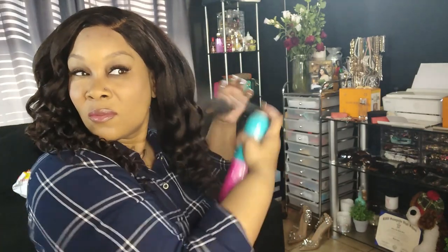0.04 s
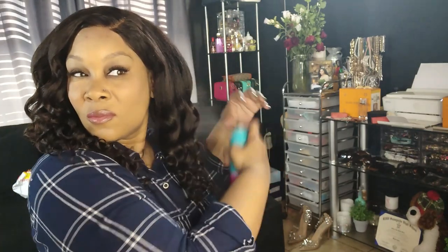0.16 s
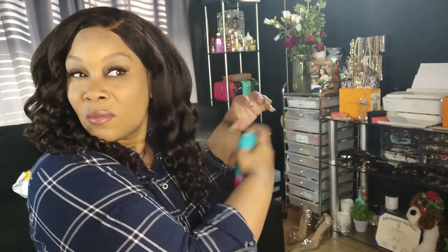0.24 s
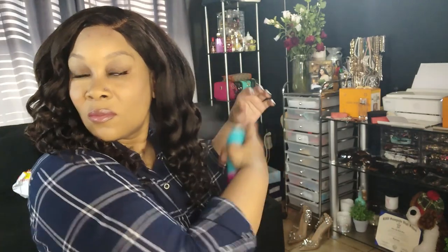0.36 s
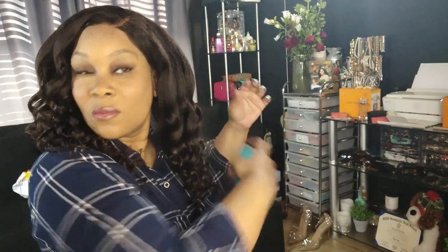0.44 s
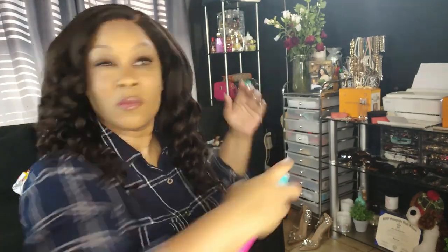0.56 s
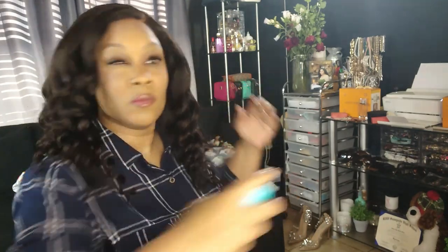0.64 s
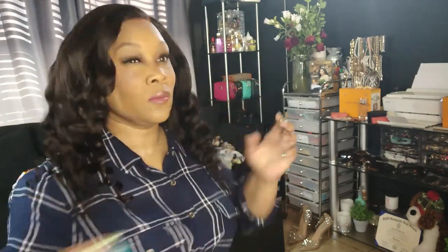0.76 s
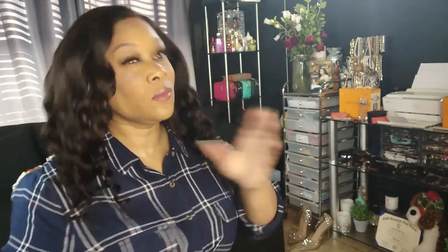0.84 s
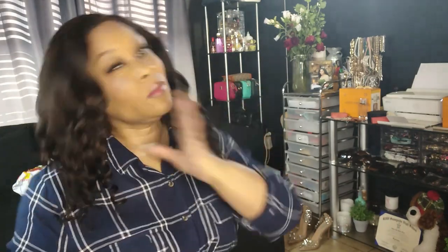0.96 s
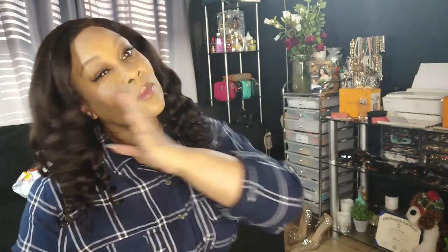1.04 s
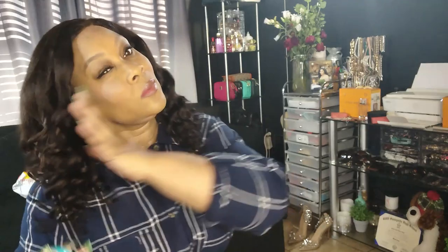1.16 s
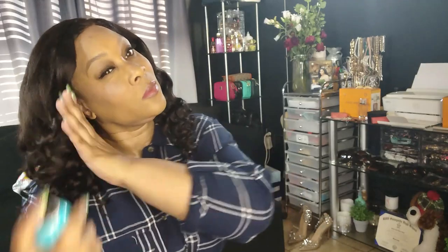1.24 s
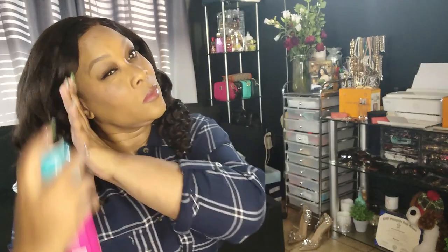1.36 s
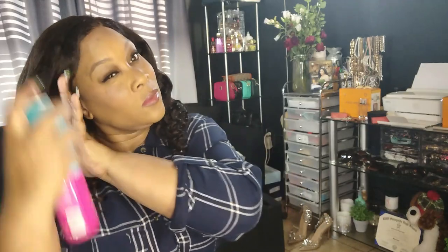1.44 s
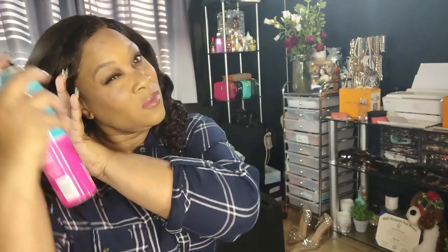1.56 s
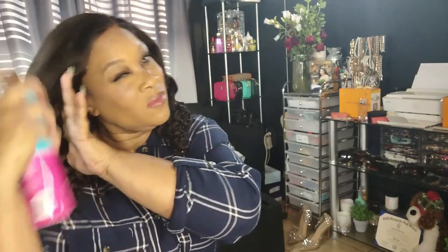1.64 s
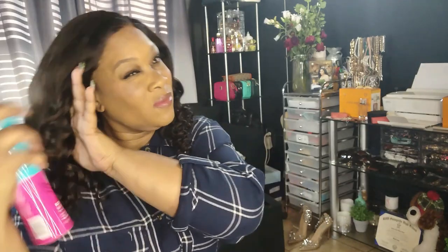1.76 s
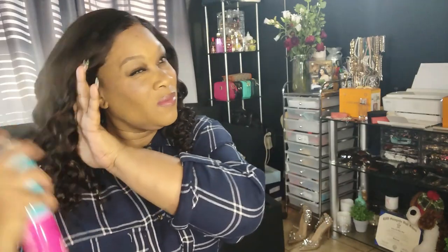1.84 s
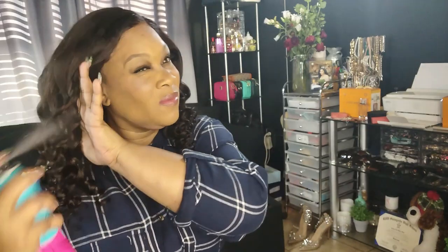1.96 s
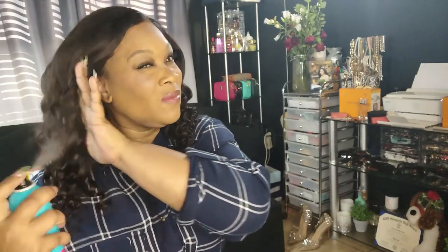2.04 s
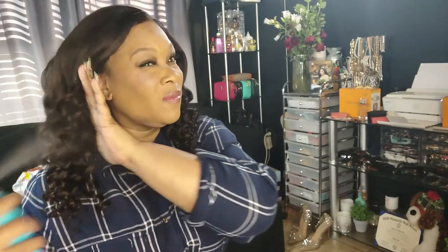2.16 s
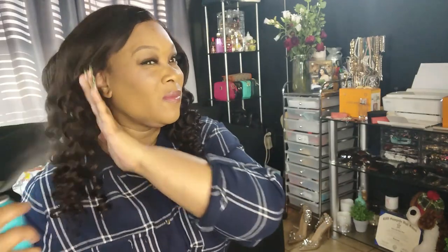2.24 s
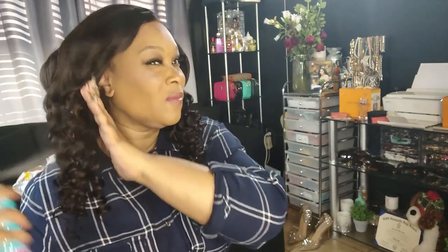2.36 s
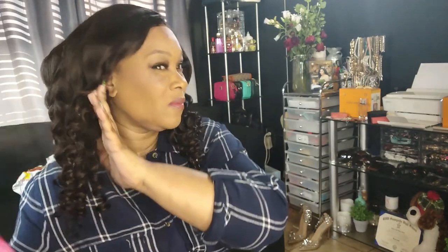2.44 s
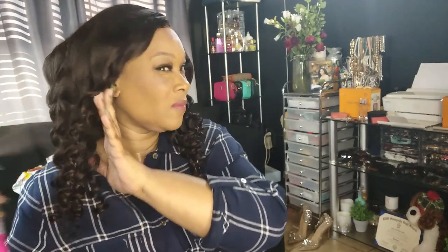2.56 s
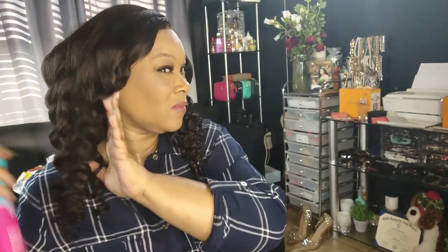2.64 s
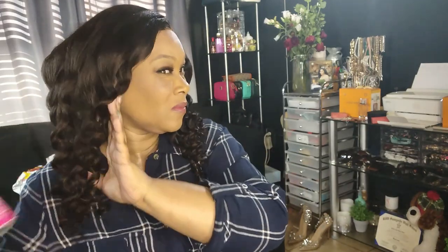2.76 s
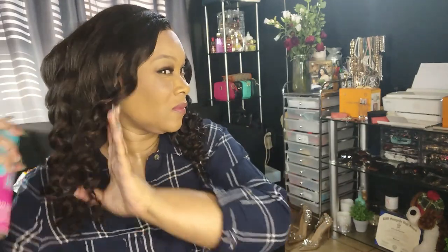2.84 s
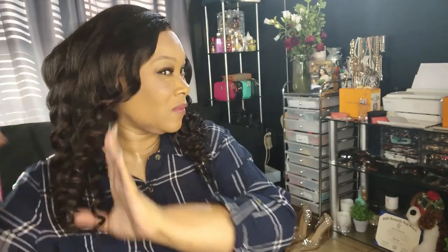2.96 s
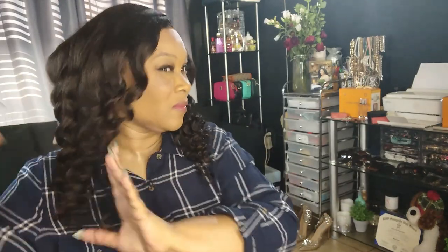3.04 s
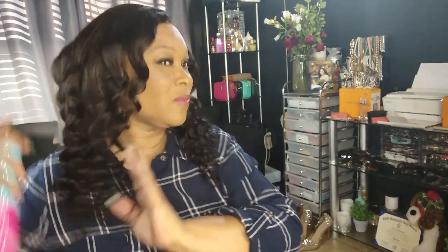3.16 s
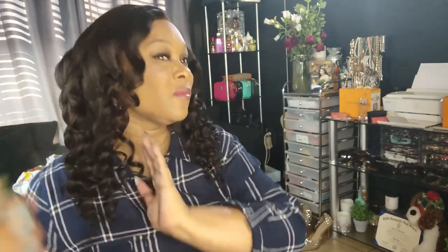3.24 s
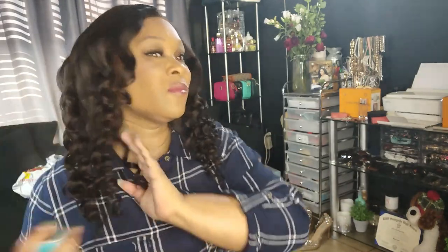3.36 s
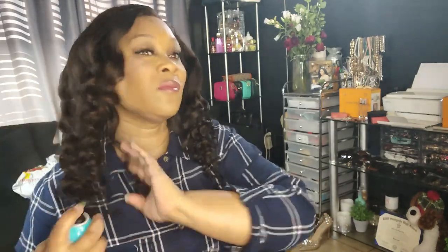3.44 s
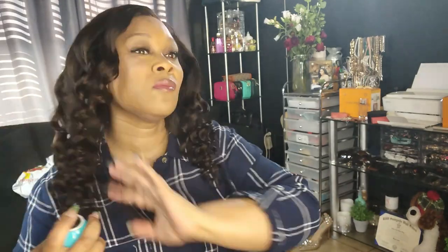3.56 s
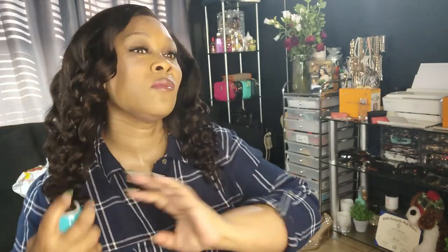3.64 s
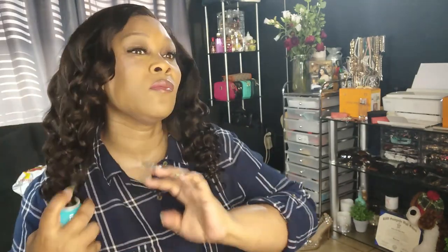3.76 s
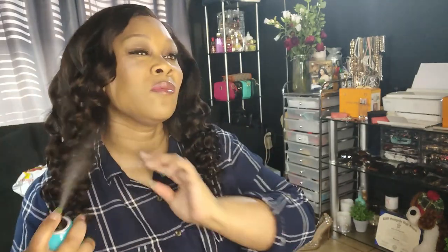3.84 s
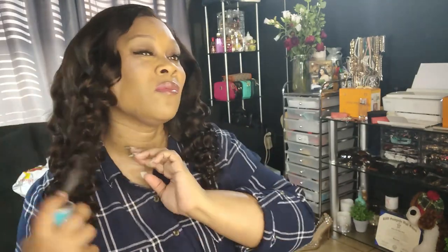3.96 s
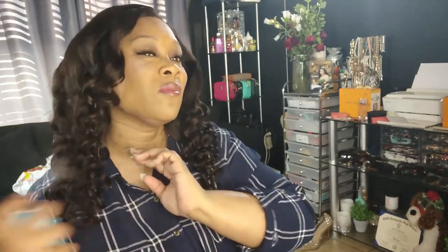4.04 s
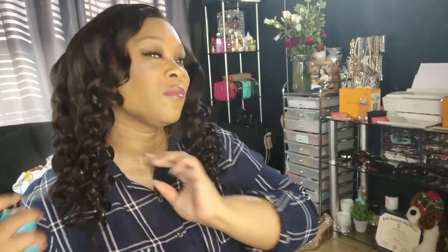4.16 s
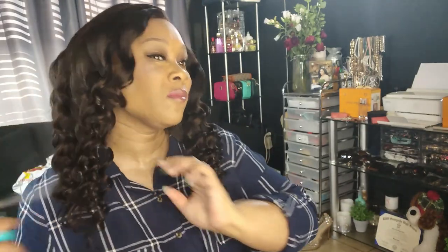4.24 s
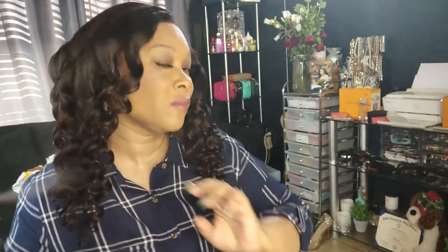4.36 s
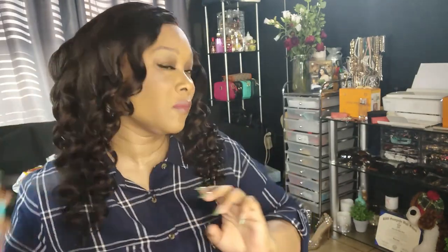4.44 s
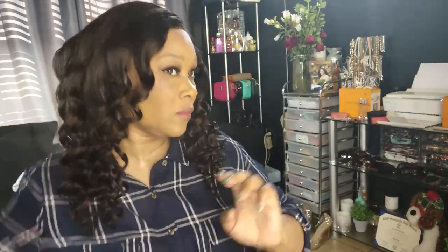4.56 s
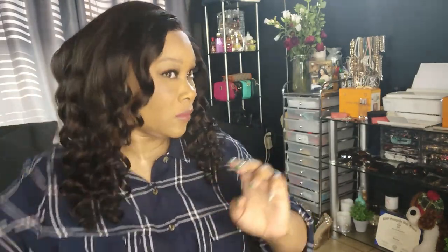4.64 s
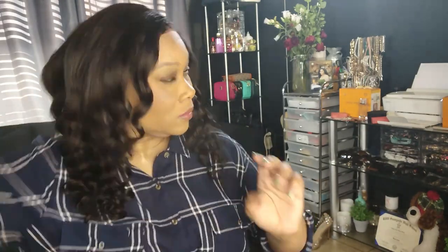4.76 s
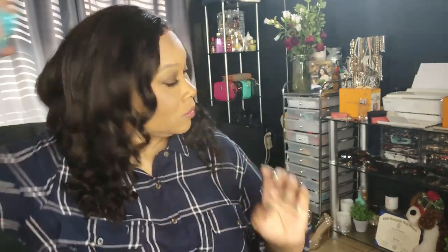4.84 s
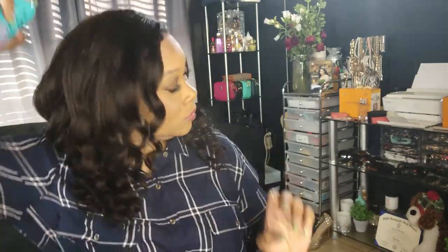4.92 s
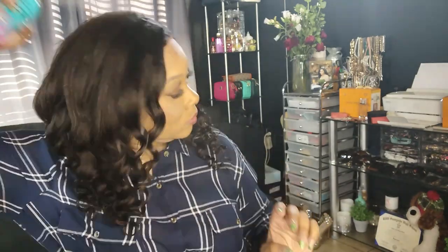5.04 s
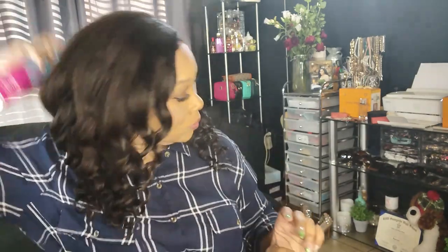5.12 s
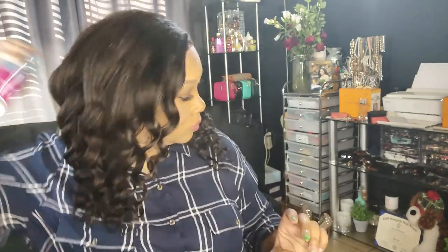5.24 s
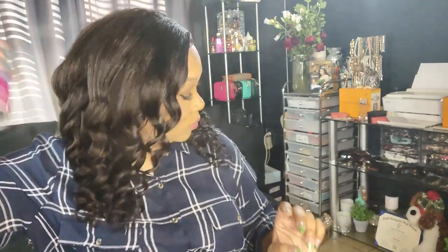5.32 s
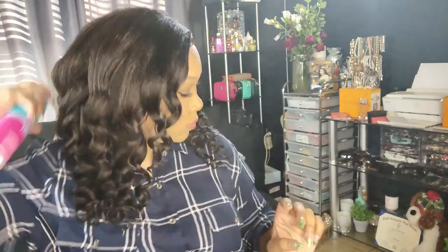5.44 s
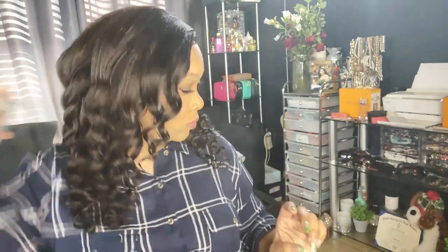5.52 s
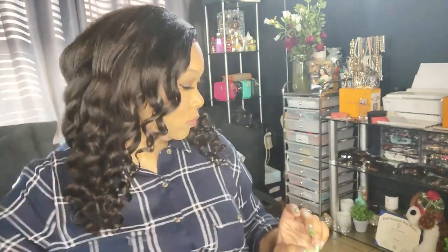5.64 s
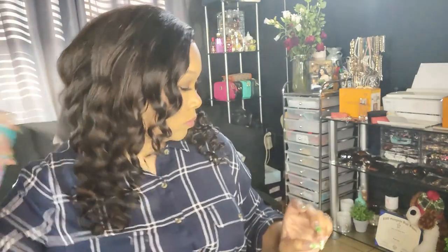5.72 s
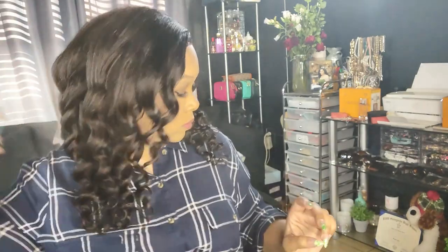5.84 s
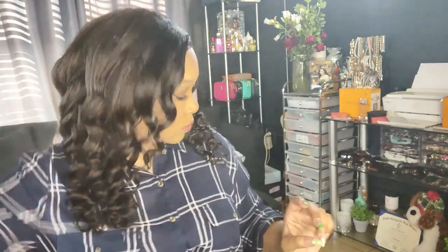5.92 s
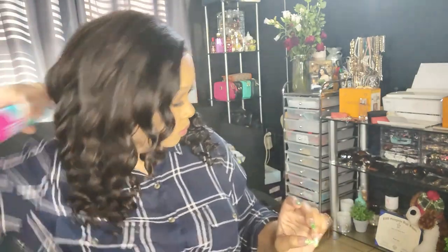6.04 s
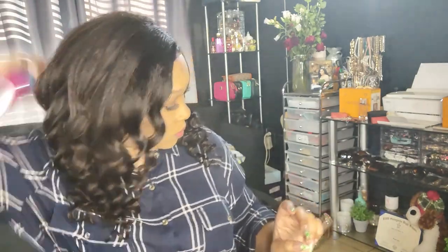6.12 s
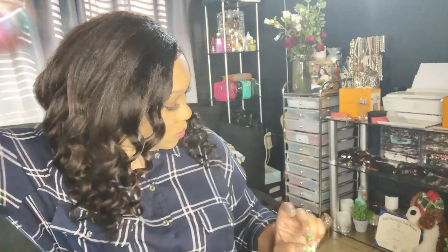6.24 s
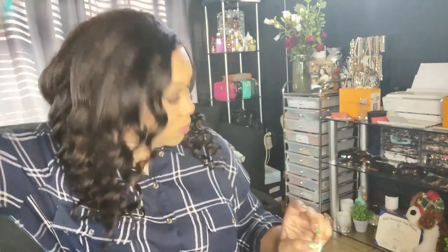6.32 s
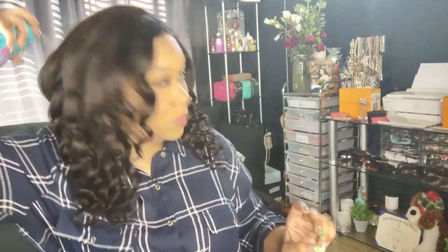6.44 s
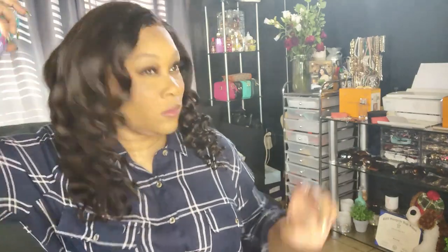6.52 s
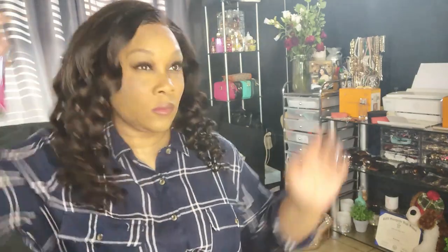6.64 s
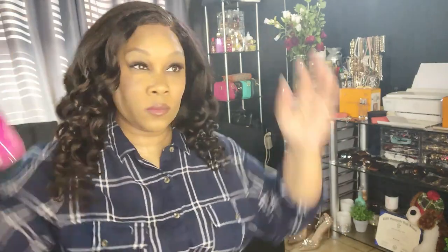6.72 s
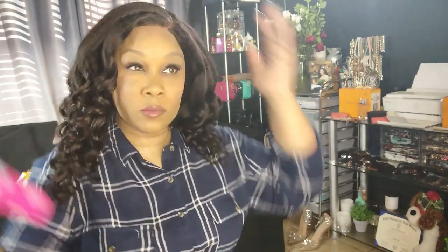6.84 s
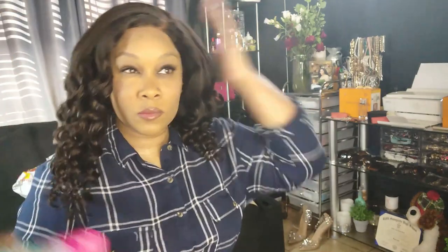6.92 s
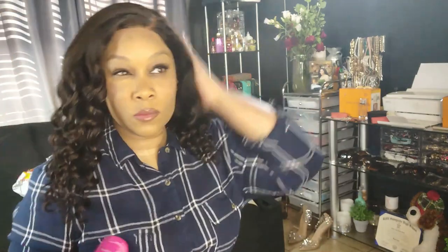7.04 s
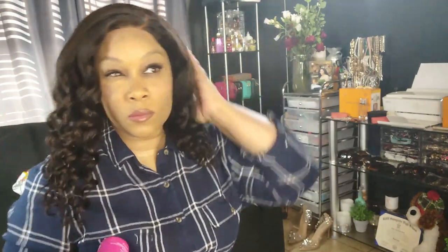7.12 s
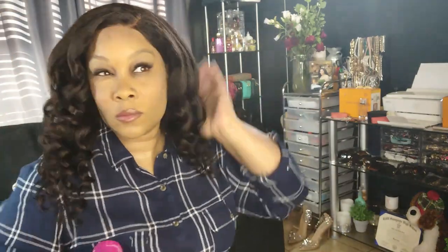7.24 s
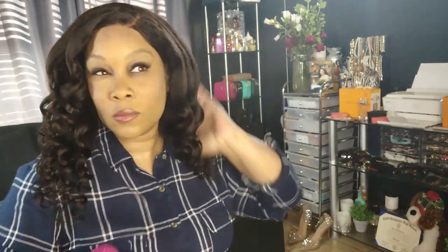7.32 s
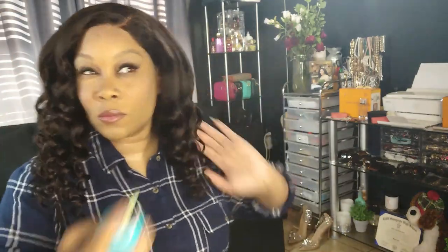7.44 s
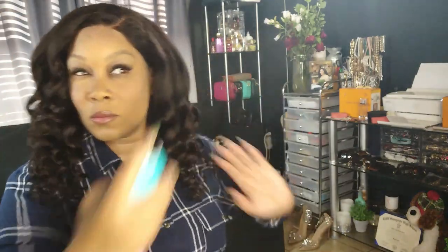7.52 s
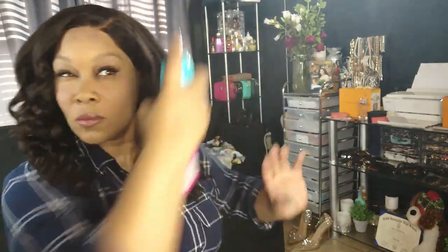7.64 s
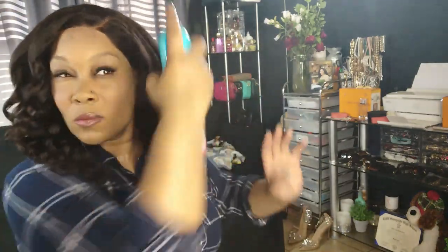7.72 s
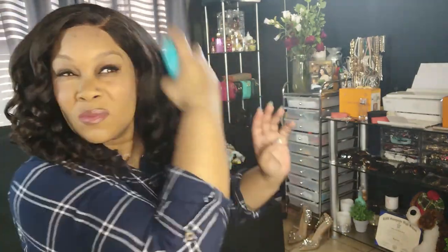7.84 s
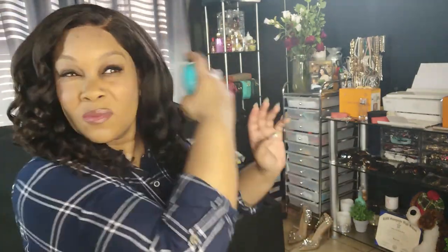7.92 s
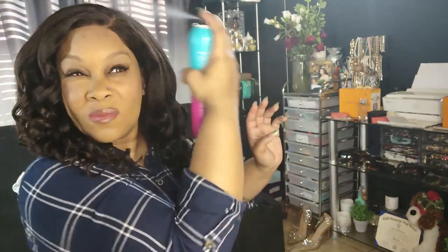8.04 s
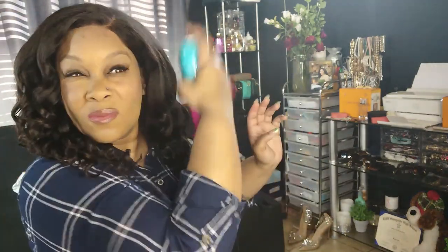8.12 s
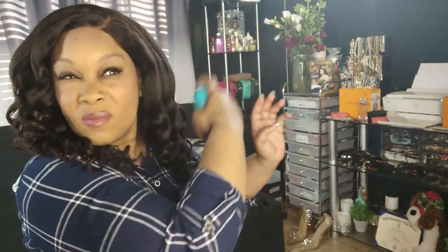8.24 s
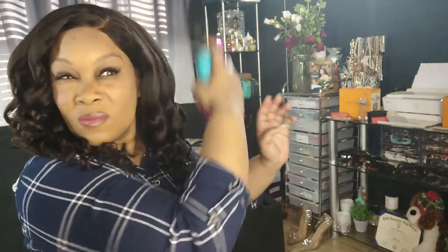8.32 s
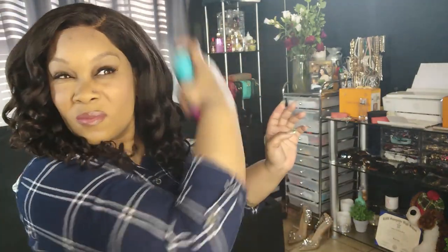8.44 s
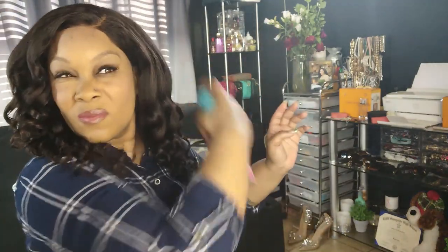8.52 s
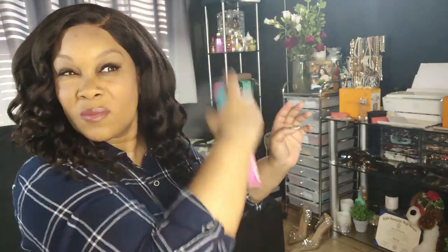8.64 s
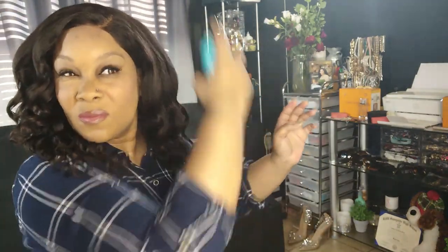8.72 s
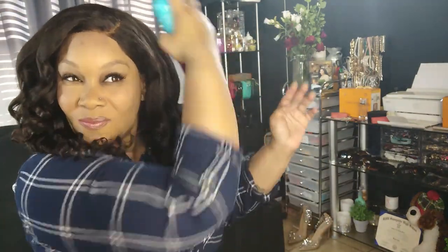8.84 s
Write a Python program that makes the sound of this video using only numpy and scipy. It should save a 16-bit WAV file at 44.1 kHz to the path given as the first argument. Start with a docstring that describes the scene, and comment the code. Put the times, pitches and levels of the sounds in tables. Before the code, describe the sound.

A spray is already hissing at the start and soon cuts off. After soft thuds and rustly movement come a longer spray, a short one almost joined to it, another short one, a longer one, then a last burst. Small ticks mark some presses. A small, quiet room with a faint low hum, heard close in stereo, brighter on the right.

```python
"""A spray can is already hissing as we begin: a bright jet of noise over a lower, softer rush of mist. It is
pressed six times in a small room, the second and third presses almost running together, while the hand sweeps
it about: noise bands follow the valve and the aim. Filtered noise makes a background that swells mostly as
sprays end, and a hush with a low hum; short bursts ring the seat as thuds, with one dull valve thump as the
last press opens, and ring the can as ticks. A thin hiss comes just before the fifth press. Two microphone ports
hear it, the right one brighter."""
import sys
import numpy as np
from scipy import signal
from scipy.fft import rfft, irfft, next_fast_len
from scipy.io import wavfile
from scipy.ndimage import map_coordinates

SR = 44100
rng = np.random.default_rng(int(sys.argv[2]) if len(sys.argv) > 2 else 0)


def output_pcm(signal):
    """Save a mono or channel-first signal as 16-bit PCM at the path in sys.argv[1].

    Samples are clipped to [-1, 1] before scaling.
    """
    pcm = np.clip(np.atleast_2d(signal).T, -1, 1) * 32767
    wavfile.write(sys.argv[1], SR, np.round(pcm).astype(np.int16))


N = 391608   # length in samples


def from_db(db):
    """Turn decibels into gain."""
    return 10 ** (np.asarray(db) / 20)


def rms_one(x):
    """Scale a sound to an rms (average strength) of 1."""
    return x / np.sqrt(np.mean(x ** 2) + 1e-20)


def in_time(rows):
    """Draw straight lines between (time [s], value) points, with a value for every sample."""
    return np.interp(np.arange(N) / SR, *np.transpose(rows))


def slow_times():
    """Times in seconds of a control that is worked out every millisecond."""
    return np.arange(0, N / SR + .002, .001)


def at_hz(points, hz):
    """Read a curve of (frequency [Hz], value) on a log-frequency axis."""
    points_hz, values = np.array(points)[:, 0], np.array(points)[:, 1]
    return np.interp(np.log(hz), np.log(points_hz), values)


def drift(rate_hz):
    """Slow random wandering with spread 1: noise smoothed twice, worked out every 40 samples."""
    r = np.exp(-80 * np.pi * rate_hz / SR)
    noise = rng.standard_normal(N // 40 + 2002)
    slow = signal.lfilter([1], [1, -2 * r, r * r], noise)[2000:]   # drop the filter's start-up
    return np.interp(np.arange(N) / 40, np.arange(len(slow)), rms_one(slow))


def resonance(x, hz, width_hz):
    """Ring at one frequency: a band-pass filter with a gain of 1 at its peak."""
    r = np.exp(-np.pi * width_hz / SR)
    feedback = [1, -2 * r * np.cos(2 * np.pi * hz / SR), r * r]
    return signal.lfilter(np.array([1, 0, -1]) * (1 - r * r) / 2, feedback, x)


def coloured(gains, alike, lag):
    """Stereo noise: a part shared by both ports (lag samples late on the left) plus each port's own part."""
    size = next_fast_len(N)
    hz = np.maximum(np.fft.rfftfreq(size, 1 / SR), 10)
    shared, own = rng.standard_normal(N), rng.standard_normal((2, N))
    late = shared
    if np.any(lag):
        late = map_coordinates(shared, [np.arange(N) - lag], order=3, mode="wrap")
    share = np.clip(at_hz(alike, hz), 0, 1)
    common = np.sqrt(share) * rfft(np.array([late, shared]), size)
    separate = np.sqrt(1 - share) * rfft(own, size)
    return irfft((common + separate) * gains(hz), size)[:, :N]


# colour of the room hush: (frequency [Hz], relative level [dB per Hz])
HUSH_COLOUR = [(18, -55), (30, -31), (124, 1.5), (153, -33), (170, -10), (210, -13), (239, -1), (328, -70),
               (889, -23), (1040, -18), (1160, -29), (4300, -30), (16000, -27.5)]
# how alike the hush and the background are at both ports: (frequency [Hz], shared part of the power [0-1])
QUIET_ALIKE = [(40, 0.51), (130, 0.42), (300, 0.084), (700, 0.032), (1500, 0.015)]
# low room hum: (frequency [Hz], width [Hz], level [dB])
HUM = [(62.3, 5.7, -71), (129, 40, -72)]
HUSH_DB = -65.5


def hush():
    """Steady room noise, plus a hum of narrow noise bands whose strength wavers by itself."""
    hum = 0
    for hz, width_hz, db in HUM:
        hum = hum + from_db(db) * rms_one(resonance(rng.standard_normal(N), hz, width_hz))
    air = rms_one(coloured(lambda hz: from_db(at_hz(HUSH_COLOUR, hz)), QUIET_ALIKE, 0))
    return from_db(HUSH_DB) * air + hum


# a faint hiss: (start [s], end [s], frequency [Hz], width [Hz], level before fading [dB])
THIN_HISS = (4.87, 5.09, 5100, 120, -76)


def thin_hiss():
    """Noise squeezed into a narrow band by two resonances; it fades in and out."""
    start, end, hz, width_hz, db = THIN_HISS
    gate = in_time([(start, 0), (start + .04, 1), (end - .02, 1), (end, 0)])
    narrow = resonance(rng.standard_normal((2, N)), hz, width_hz)
    narrow = resonance(narrow, hz, width_hz)
    return from_db(db) * gate * rms_one(narrow)


# colour of the soft background noise: (frequency [Hz], relative level [dB per Hz])
BACKGROUND_COLOUR = [(120, -36), (200, -16), (322, -0.5), (836, -4.5), (1060, -6.5), (1400, -6.5),
                     (2470, -7.5), (5230, -12.5), (16000, -23)]
# swells of the background noise: (time of peak [s], peak level [dB], fade [dB per s])
SWELLS = [(.56, -55, 25), (.9, -58, 13.5), (1.2, -65.5, 9), (3.32, -58.5, 9), (4.66, -60.5, 7),
          (4.98, -60.5, 46), (6.62, -58, 14), (7.0, -62.5, 24.5), (7.2, -66, 28), (7.47, -65, 90),
          (7.86, -65, 36), (8.8, -58.5, 22)]
SWELL_RISE_DB_PER_S = 79


def background(grain_db):
    """Soft, slightly lumpy background noise that swells and fades, mostly as each spray ends."""
    peak_s, peak_db, fade = np.transpose(SWELLS)[:, :, None]
    since = slow_times() - peak_s
    swell_db = np.minimum(SWELL_RISE_DB_PER_S * since, -fade * since)
    swells = np.linalg.norm(from_db(peak_db + swell_db), axis=0)   # swells add their power
    noise = rms_one(coloured(lambda hz: from_db(at_hz(BACKGROUND_COLOUR, hz)), QUIET_ALIKE, 0))
    return in_time(np.c_[slow_times(), swells]) * from_db(grain_db * drift(25)) * noise


def blow(start_s, peak_db, contact, modes, alike, top_hz, kick):
    """A first kick and a dying noise burst, dull if the contact is soft, make a body ring at its modes."""
    start = round(start_s * SR)
    noise = rng.standard_normal((3, len(contact)))
    burst = contact * (alike * noise[0] + (1 - alike) * noise[1:])
    burst[:, 0] += kick * np.linalg.norm(burst[0])
    burst = signal.sosfilt(signal.butter(4, top_hz, fs=SR, output="sos"), burst)
    rings = 0
    for hz, width_hz, db in modes:
        rings = rings + from_db(db) / np.sqrt(width_hz) * resonance(burst, hz, width_hz)
    rings = rings * from_db(peak_db) / np.abs(rings).max()
    out = np.zeros((2, N))
    out[:, start:start + len(contact)] = rings[:, :N - start]
    return out


# dull thuds, the one at 7.942 s a valve thump as the last press opens: (time [s], peak [dB], tilt [dB per
# octave], contact's 60 dB fade [s], top frequency [Hz])
THUDS = [(0.226, -42, -14, .08, 500), (0.865, -34, 7, 0.08, 850), (0.879, -36.5, 9, 0.06, 700),
         (0.894, -40.5, 9, 0.25, 700), (1.109, -40, -8, 0.1, 950), (1.125, -41.5, -9, 0.18, 800),
         (1.158, -47, -8, 0.2, 600), (1.377, -48, -28, 0.032, 300), (2.189, -42, -4, 0.15, 600),
         (0.736, -49, 12, 0.11, 2000), (5.285, -39, 4, 0.19, 900), (7.783, -47, -3, 0.15, 700),
         (7.795, -45, -10, 0.08, 400), (7.942, -42.5, 4, 0.84, 1200), (8.258, -38.5, 11.5, 0.47, 1100),
         (8.579, -39, 3, 0.16, 1110), (8.808, -45, -30, 0.2, 249)]
# modes of the seat: (frequency [Hz], width [Hz], level before the tilt [dB])
SEAT = [(135, 18, -5), (221, 37, 2.5), (385, 160, 7), (617, 144, 3.5), (940, 200, -0.5), (1450, 360, -5.5)]


def thuds(rise_s, tail_db, tail_lasts):
    """Soft blows, mostly on the seat, one a valve thump as the last press opens: contact swells and dies with a
    longer, fainter tail; tilt favours some modes."""
    out, t = 0, np.arange(SR // 2) / SR
    for start_s, peak_db, tilt_db, t60_s, top_hz in THUDS:
        fade = from_db(-60 * t / t60_s)
        tail = from_db(tail_db - 60 * t / (tail_lasts * t60_s))
        contact = (1 - np.exp(-t / rise_s)) * (fade + tail)
        modes = [(hz, width_hz, db + tilt_db * np.log2(hz)) for hz, width_hz, db in SEAT]
        out = out + blow(start_s, peak_db, contact, modes, alike=.85, top_hz=top_hz, kick=.3)
    return out


# nail, cap and valve ticks on the can: (time [s], peak before left-right shift [dB], centre [Hz],
# fall away from the centre [dB per octave], tail start against the crack [dB], left minus right [dB])
TICKS = [(0.868, -43, 4500, 8, -2, -10), (1.204, -45, 3300, 23, 7, -6), (1.642, -42.5, 7960, 3, 3, -7),
         (2.83, -38, 4500, 12, 12, -5), (3.872, -45, 6000, 16, 14, -10), (5.086, -37, 9000, 8, 11, -3),
         (7.1, -32.5, 5000, -3, -4, -4.5), (7.109, -40, 11000, 3, -5, -6), (7.922, -50, 9000, 2, -11, -15)]
# modes of the can: (frequency [Hz], width [Hz], level before the fall [dB])
CAN = [(1640, 180, -1), (2510, 400, 11), (3100, 440, 10), (3750, 500, 8), (5600, 870, 10.5),
       (9000, 5100, 11), (13000, 7100, 10)]
CRACK_T60_S, TICK_TAIL_T60_S = .03, .27   # times to fade by 60 dB


def ticks():
    """Hard ticks: a short crack and a longer noisy tail ring the can, weighted around each tick's centre."""
    out, t = 0, np.arange(SR // 2) / SR
    crack, tail = from_db(-60 * t / CRACK_T60_S), from_db(-60 * t / TICK_TAIL_T60_S)
    for start_s, peak_db, centre_hz, fall_db, tail_db, pan_db in TICKS:
        modes = [(hz, width_hz, db - fall_db * abs(np.log2(hz / centre_hz))) for hz, width_hz, db in CAN]
        contact = crack + from_db(tail_db) * tail
        tick = blow(start_s, peak_db, contact, modes, alike=0.27, top_hz=18000, kick=0.094)
        out = out + tick * from_db([[pan_db / 2], [-pan_db / 2]])
    return out


ROOM_T60_S, ROOM_DB = 0.2, -9.5   # time to fade by 60 dB, level of the tail


def room(x):
    """Blurred room tail: dying noise, different in each channel and duller on top, smears the sound."""
    t = np.arange(SR // 2) / SR
    noise = signal.lfilter([1], [1, -.5], rng.standard_normal((2, len(t))))
    tail = noise * from_db(-60 * t / ROOM_T60_S)
    tail = tail / np.sqrt(np.sum(tail ** 2, axis=1, keepdims=True))
    return from_db(ROOM_DB) * signal.fftconvolve(x, tail, axes=1)[:, :N]


# colour of the jet at each port: (frequency [Hz], left [relative dB per Hz], right [relative dB per Hz])
JET_COLOUR = [(144, -16.5, -20), (292, -13.5, -17.5), (300, -12.5, -10), (756, -9, -8),
              (1180, -11.5, -10.5), (1750, -6.5, -6), (2170, -6, -4), (2500, -12.5, -10),
              (4500, -10.5, -8.5), (7050, -13.5, -4.5), (7900, -10, -0.5), (8100, -9, 2), (11400, -7, 0),
              (14100, -4.5, 0), (16300, -4.5, -3)]
# hollow can humming under the jet: (frequency [Hz], width [Hz], boost [dB])
CAN_HUM = [(320, 60, 4), (616, 55, 3), (960, 150, 2), (1316, 80, 2), (1875, 150, 2), (2250, 300, 2)]


def jet_colour(hz):
    """Gain of the jet at each port, boosted around the hollow can's own notes."""
    hum_db = sum(db / (1 + (2 * (hz - centre) / width) ** 2) for centre, width, db in CAN_HUM)
    return from_db([at_hz(np.array(JET_COLOUR)[:, [0, port]], hz) + hum_db for port in (1, 2)])


# near surfaces (head, shoulder, desk, wall) that throw the jet back: (delay [ms], wander [ms], level [dB])
ECHOES = [(.72, .2, -12), (2.6, .7, -11), (4.3, .8, -12), (7.9, .9, -12)]


def echoes(x):
    """The moving hand makes each echo's delay wander, so the comb it cuts into the hiss shifts."""
    out, n = x.copy(), np.arange(N)
    for delay_ms, wander_ms, db in ECHOES:
        wander = drift(1.5)
        for port in range(2):
            port_wander = wander + 0.239 * drift(1.45)   # the ports differ a little
            lag = (delay_ms + wander_ms * port_wander) * SR / 1000
            out[port] += from_db(db) * np.interp(n - lag, n, x[port])
    return out


# finger on the nozzle: (pressed [s], let go [s], time to build up [s], low rush before sweep [dB])
PRESSES = [(-.5, 0.53, 0.091, -48), (1.638, 2.79, 0.23, -46), (2.828, 3.273, 0.088, -46),
           (3.865, 4.617, 0.037, -46.5), (5.075, 6.558, 0.021, -46.5), (7.913, 8.772, 0.24, -49)]
OPEN_S, BUILD_DB = 0.018, 10   # time scale of cracking open, shortfall that then builds up


def valve(late_s, follows, close_s):
    """Flow of each press in dB under full: cracks open, builds up, holds, then shuts ever faster."""
    pressed, let_go, build_s, _ = np.transpose(PRESSES)[:, :, None]
    since = np.maximum(slow_times() - pressed - late_s, 0)
    closing = np.maximum(slow_times() - let_go, 0)
    crack_db = 40 * np.log10(1 - np.exp(-since / OPEN_S) + 1e-9)
    build_db = -follows * BUILD_DB * np.exp(-since / build_s)
    return crack_db + build_db - 20 * (closing / close_s) ** 2   # 20 dB down after close_s


# full-flow jet as the hand sweeps the can, before aim and wavering: (time [s], level [dB])
SWEEP = [(0, -34), (.3, -33.5), (.55, -34), (1.75, -32.5), (2, -30.5), (2.45, -32), (2.67, -34.5),
         (2.79, -32.5), (2.95, -29), (3.18, -36.5), (3.27, -31.5), (4, -32), (4.3, -31.5), (4.63, -34.5),
         (5.28, -34), (5.5, -31.5), (5.74, -31.5), (5.92, -35.5), (6.07, -35.5), (6.2, -37), (6.4, -31.5),
         (6.57, -31.5), (8.27, -29), (8.44, -32), (8.69, -29.5), (8.8, -32)]
JET_CLOSE_S, RUSH_CLOSE_S = 0.048, 0.065   # the rush dies more slowly
RUSH_LATE_S, RUSH_FOLLOWS = 0.0057, 0.6   # the rush starts later and follows part of the jet's swings


def spray_levels():
    """Levels in dB of the bright jet and the low rush; overlapping presses add their power."""
    sweep_db = np.interp(slow_times(), *np.transpose(SWEEP))
    rush_db = np.array(PRESSES)[:, 3:] + RUSH_FOLLOWS * (sweep_db - sweep_db.mean())
    jet = from_db(sweep_db + valve(0, 1, JET_CLOSE_S))
    rush = from_db(rush_db + valve(RUSH_LATE_S, RUSH_FOLLOWS, RUSH_CLOSE_S))
    levels = [10 * np.log10(np.sum(part ** 2, axis=0) + 1e-14) for part in (jet, rush)]
    return [in_time(np.c_[slow_times(), db]) for db in levels]


# how alike the jet noise is at both ports: (frequency [Hz], shared part of the power [0-1])
JET_ALIKE = [(200, .7), (700, .7), (1500, .65), (2500, .5), (5000, .35), (9000, .25)]
# the can changes sides: (time [s], lag of the left port [ms])
LEFT_LAG = [(0, -.15), (1, -.1), (1.7, .27), (3, .36), (4, .25), (6.6, .3), (7.9, .05), (8.88, .05)]
# where the nozzle points: (time [s], jet left minus right [dB], topmost hiss [dB],
# then the five bands of AIMED_HZ: low hum [dB], middle rush [dB], nozzle ring [dB], lower hiss [dB],
# upper hiss [dB])
AIM = [(0, 2, 3, 5.5, -1, 2.2, 1, -0.17), (.55, 0.5, 3.5, -2, -5, 0.32, 1, -0.44),
       (1.8, 0.5, -3.5, 3.5, -3, 0.5, 1, 0.87), (2.2, 0.5, 0.5, 2.5, -1, -1.2, 1, -.5),
       (2.6, -1.5, 2, -3, -3.5, -1.5, -0.71, -0.81), (3.1, 0.5, 0, -2, -2.5, -2.5, 0.55, -0.12),
       (4, 0.5, -1, -3, 2.5, -0.59, 1, 1), (4.6, .5, 2.5, -8, -4.5, 1, 1, -1.6),
       (5.3, 0, -0.5, 2, -1, -0.23, -1.9, 0), (5.7, -0.5, 0.5, -7.5, 1, -0.36, -2, -1.7),
       (6, 0, 1.5, -1, -4.5, 1.7, -0.29, 1.1), (6.2, 0, 0.5, 3, 3, 0.41, -1.8, -0.26),
       (6.5, 1, 1, -9.5, 0, -0.23, -2.2, -1.3), (8, 1, -0.5, -0.5, 2, -2.2, -1.8, -0.28),
       (8.4, .5, 2, 1, -0.5, 0, -0.25, -0.7), (8.8, 1, 1, -6, 0.5, -1, 0, -1.2)]
# bands that change with the aim: (frequency [Hz])
AIMED_HZ = [320, 820, 2100, 3400, 5400]
TOP_FROM_HZ = 9000   # the topmost hiss grows in from here
RUSH_TOP_HZ, JET_FROM_HZ = 2600, 7000   # all rush below the first, all jet above the second


def spray(patchy_db, sputter_db):
    """Turbulent jet noise in ten bands; the valve, the sweep and the aim set the level of each."""
    jet_db, rush_db = spray_levels()
    size = next_fast_len(N)
    hz = np.fft.rfftfreq(size, 1 / SR) + 1   # 1 Hz up, so the log axis has no zero
    noise = coloured(jet_colour, JET_ALIKE, in_time(LEFT_LAG) * SR / 1000)
    whole = rfft(echoes(noise), size)

    # scale rush and jet each to one common strength, blending in between
    jet_part = [(RUSH_TOP_HZ, 0), (JET_FROM_HZ, 1)]
    treble = at_hz(jet_part, hz)
    rush_rms = np.linalg.norm(whole[:, treble == 0]) / size
    jet_rms = np.linalg.norm(whole[:, treble == 1]) / size
    whole = whole / (rush_rms ** (1 - treble) * jet_rms ** treble)

    centres = np.geomspace(200, 14000, 10)
    sputter = sputter_db * drift(100)   # droplets leave the nozzle unevenly
    pan_db, top_db, *aimed_db = (in_time(np.array(AIM)[:, [0, column]]) for column in range(1, 8))
    out = 0
    for k, centre in enumerate(centres):
        window = at_hz(np.c_[centres, np.arange(10) == k], hz)
        band = irfft(whole * window, size)[:, :N]
        share = at_hz(jet_part, centre)
        level_db = share * jet_db + (1 - share) * rush_db
        level_db = level_db + top_db * at_hz([(TOP_FROM_HZ, 0), (14000, 1)], centre)
        for db, aimed_hz in zip(aimed_db, AIMED_HZ):
            if abs(np.log2(centre / aimed_hz)) < .3:   # within 0.3 octave
                level_db = level_db + db
        # treble and bass waver less
        waver = (1 - 0.5 * share) * at_hz([(300, .5), (3000, .8), (5000, 1)], centre)
        patchy = waver * patchy_db * drift(11.2)
        side_db = share * pan_db * [[.5], [-.5]]
        out = out + band * from_db(side_db + level_db + sputter + patchy)
    return out


def scene():
    """Add up all sources; only the spray gets a room tail."""
    mist = spray(patchy_db=2.0, sputter_db=0.7)
    knocks = thuds(rise_s=.003, tail_db=-16, tail_lasts=2.2) + ticks()
    return hush() + thin_hiss() + background(grain_db=0.5) + knocks + room(mist) + mist


def record(dry):
    """Cut the deepest bass below 46 Hz and the very top above 15900 Hz."""
    thin = signal.sosfilt(signal.butter(3, 46, "high", fs=SR, output="sos"), dry)
    return signal.sosfilt(signal.ellip(12, .5, 70, 15900, fs=SR, output="sos"), thin)


dry = scene()
out = record(dry)
output_pcm(out)
```